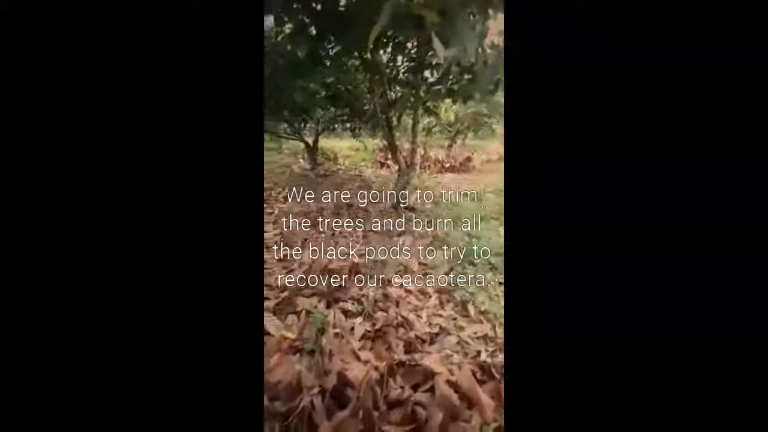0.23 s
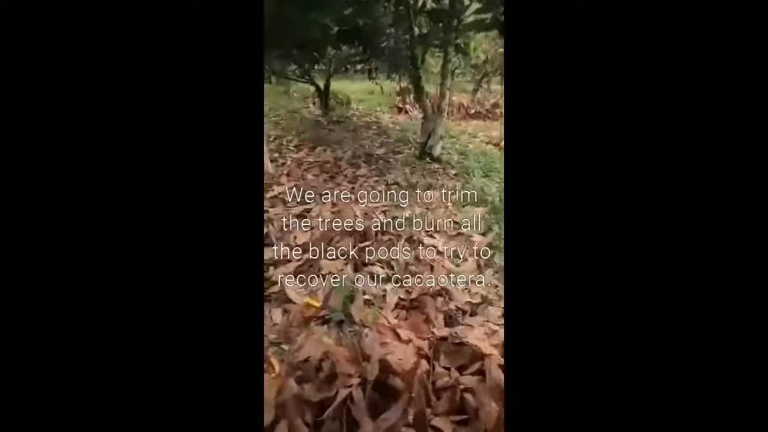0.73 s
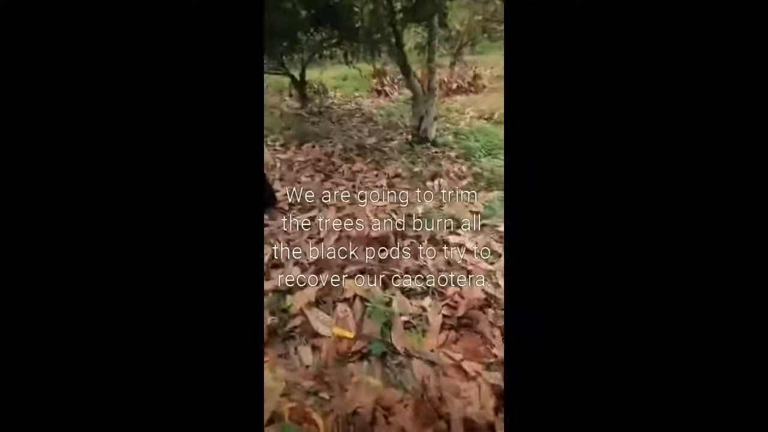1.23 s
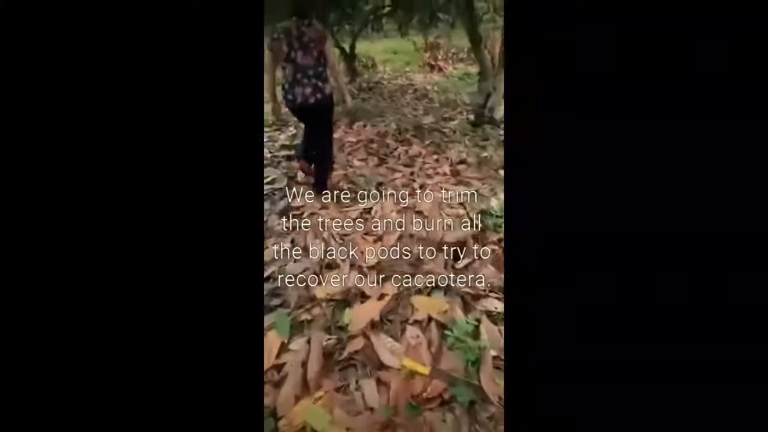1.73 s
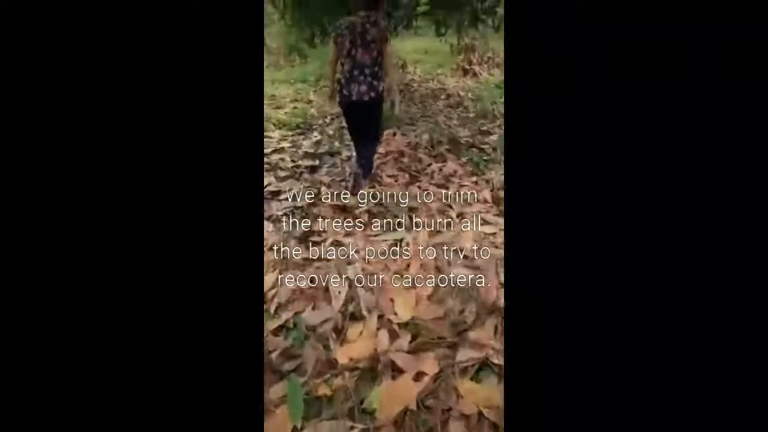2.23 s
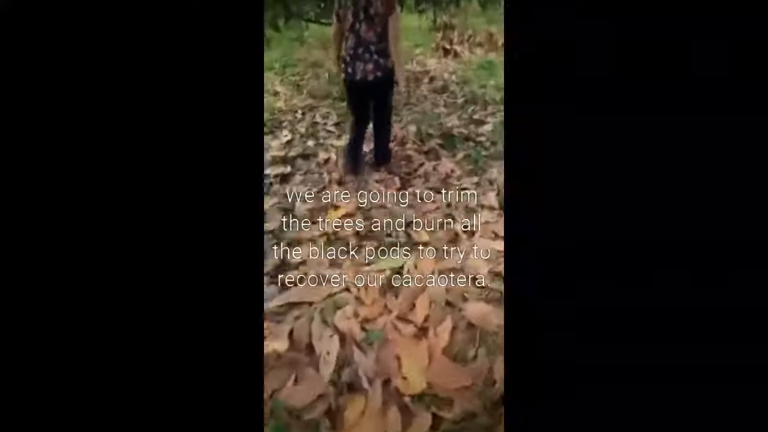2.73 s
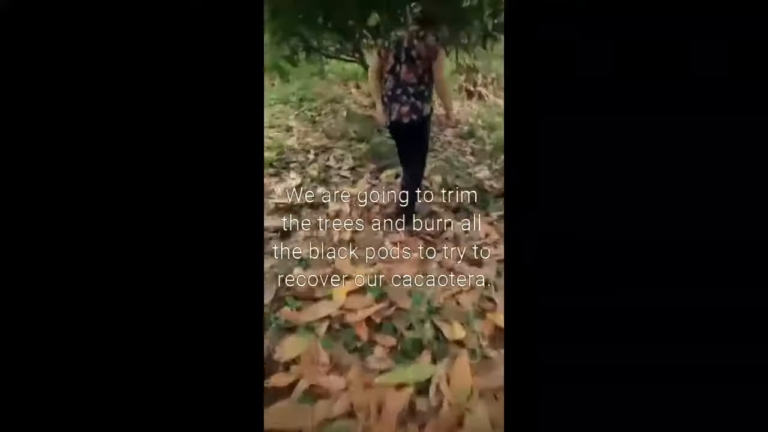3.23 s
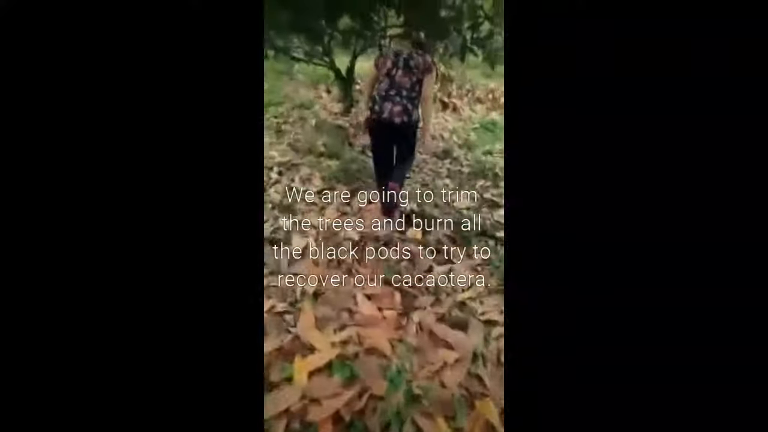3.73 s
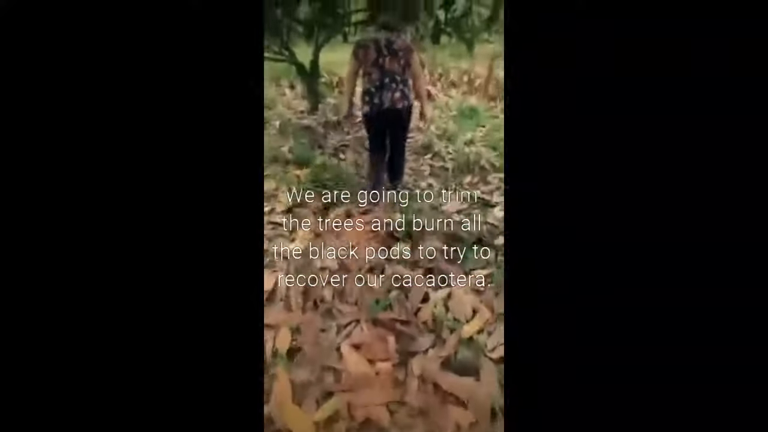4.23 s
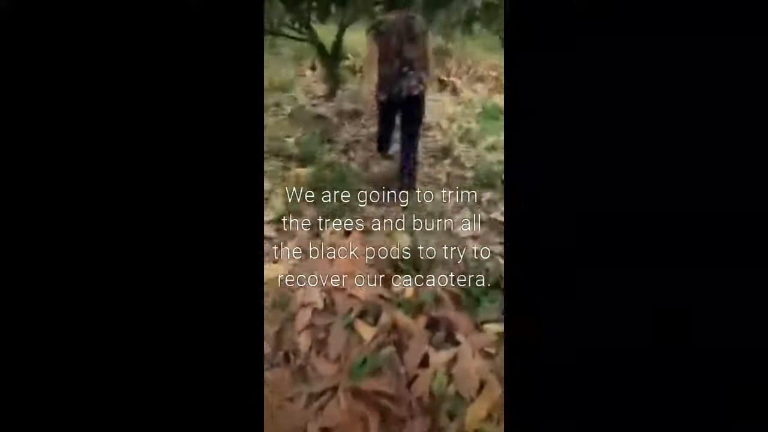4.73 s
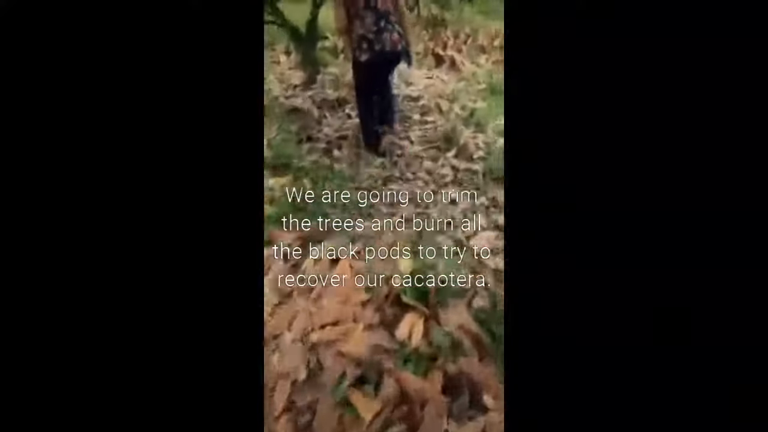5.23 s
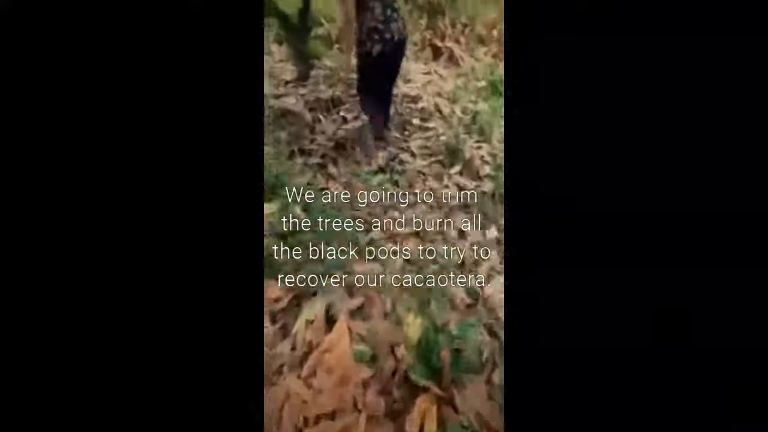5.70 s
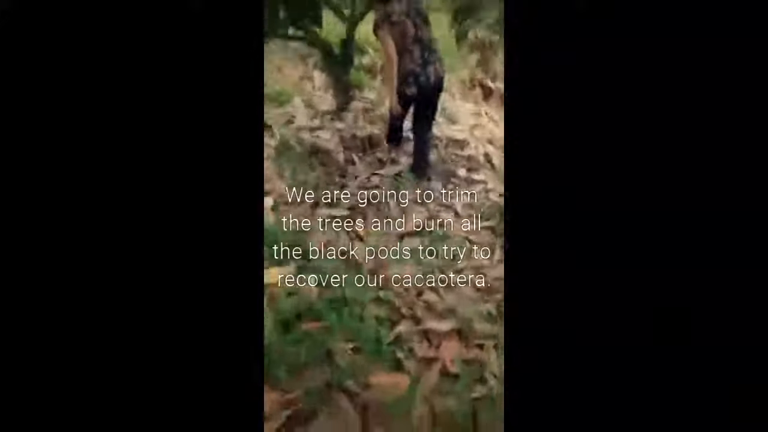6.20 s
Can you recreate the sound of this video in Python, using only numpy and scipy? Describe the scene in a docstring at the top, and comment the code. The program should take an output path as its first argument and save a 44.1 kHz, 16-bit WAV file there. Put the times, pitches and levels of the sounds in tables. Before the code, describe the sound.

Feet wade through a thick layer of dry leaves outdoors. A very brief low tone opens, then lighter rustles and modest crunches with scattered twig snaps. From about three seconds the steps become clearly louder and crisper, with sharp cracks and hollow knocks in the litter. Quiet air and soft bumps touch the close stereo microphone; the trees return only a faint echo.

```python
"""Two people walk through deep dry leaves under trees. A brief low tone comes first, over a faint hush and air.
Then feet rustle, stalks and twigs snap, and footfalls break showers of leaves and press and scuff the litter. A
little later, soft bumps sound at the microphone and hollow pockets in the litter knock as they cave in. Leaves,
snaps and knocks are noise bursts and short rings; the low tone and the bumps are short low swells, tones
roughened by noise; hush and air are coloured noise."""
import sys
import numpy as np
from scipy import signal
from scipy.fft import rfft, irfft
from scipy.io import wavfile
from scipy.ndimage import uniform_filter1d

SR = 44100
rng = np.random.default_rng(int(sys.argv[2]) if len(sys.argv) > 2 else 0)


def store_wav(level_fs):
    """Save 16-bit WAV to argv[1]."""
    pcm = np.round(np.clip(np.atleast_2d(level_fs), -1, 1) * 32767)
    wavfile.write(sys.argv[1], SR, pcm.T.astype(np.int16))


N = 284974


def from_db(db):
    """Turn decibels into gain."""
    return 10 ** (np.asarray(db) / 20)


def rms_one(x):
    """Scale to an average power of 1."""
    return x / np.sqrt(np.mean(x ** 2) + 1e-20)


def at_hz(points, hz):
    """Read a curve of (Hz, value) points along a log-frequency axis."""
    point_hz, value = np.transpose(points)
    return np.interp(np.log(hz + 1e-3), np.log(point_hz), value)


def colour(x, db_at):
    """Filter without pre-echo (minimum phase), with a gain in dB of db_at(Hz)."""
    size = 4096
    log_gain = np.log(from_db(db_at(np.fft.rfftfreq(size, 1 / SR))))
    # folding the cepstrum onto positive times makes the response start at once
    cepstrum = irfft(log_gain)
    cepstrum[1:size // 2] *= 2
    cepstrum[size // 2 + 1:] = 0
    response = irfft(np.exp(rfft(cepstrum)))
    return signal.oaconvolve(np.atleast_2d(x), response[None], axes=1)[:, :N]


def shaped(x, spectrum):
    """Filter a sound by a curve of (Hz, dB) points."""
    return colour(x, lambda hz: at_hz(spectrum, hz))


def band(x, low_hz, high_hz, order=4):
    """Keep the frequencies between two limits."""
    limits = [low_hz, min(high_hz, .45 * SR)]
    return signal.sosfilt(signal.butter(order, limits, "band", fs=SR, output="sos"), x)


def resonance(x, hz, width_hz):
    """Ring at one pitch, with a gain near 1 there; a narrower width rings longer."""
    r = np.exp(-np.pi * width_hz / SR)
    zeros = np.array([1, 0, -1]) * (1 - r * r) / 2
    poles = [1, -2 * r * np.cos(2 * np.pi * hz / SR), r * r]
    return signal.lfilter(zeros, poles, x + 1e-18)


def drift(rate):
    """Wander at random through `rate` new values a second, joined by lines, with RMS 1."""
    knots = rng.standard_normal(4000)
    return rms_one(np.interp(np.arange(N) / SR * rate, np.arange(len(knots)), knots))


def outdoors(hush_db=-61.5, air_db=-65.5, lumps_db=4.0):
    """A faint hush, and lumpy air that stirs steadily and comes in puffs, felt by each port on its own."""
    # Colour of the hush. Each row: frequency in Hz, relative level in dB per Hz.
    hush_colour = [(18, -31), (30, 1), (43, -6), (113, -2.5), (167, -3), (190, 1), (859, -20), (1240, -7),
                   (2310, -15.5), (5440, -20.5), (7240, -20), (8250, -38), (15000, -60)]
    # Colour of the stirring air. Each row: frequency in Hz, relative level in dB per Hz.
    air_colour = [(20, -24), (45, -15), (78, 0), (140, -3), (250, -15), (600, -40)]
    # Puffs of air at the microphone.
    # Each row: middle in seconds, level in dB, half-width in seconds (where power is down to 1/e).
    puffs = [(0.881, -60.5, 0.091), (1.47, -53.0, 0.19), (3.25, -64, 0.17), (4.2, -57, 0.21),
             (4.82, -58.0, .08), (5.6, -53.5, 0.069), (6.18, -56.5, .16)]
    t = np.arange(N) / SR
    power = from_db(air_db) ** 2
    for middle, db, width in puffs:
        power = power + from_db(db) ** 2 * np.exp(-((t - middle) / width) ** 2)
    lumps = from_db(lumps_db * np.array([drift(25), drift(25)]))
    air = rms_one(shaped(rng.standard_normal((2, N)), air_colour) * lumps)
    hush = rms_one(shaped(rng.standard_normal((2, N)), hush_colour))
    return np.sqrt(power) * air + from_db(hush_db) * hush


def bumps(trim_db=-3.5, swell_s=0.0032, rough=0.31):
    """Short low swells, often stronger on one side: a tone roughened by noise. Apart from the opening tone,
    they are bumps of low pressure at the ports."""
    # Short low swells; the first is a brief low tone at 320 Hz that opens the scene, the others are soft bumps
    # at the microphone. # Each row: start in seconds, peak in dB before the trim, pitch in Hz, left minus right
    # in dB.
    low_swells = [(0.0, -36, 320, 2), (0.772, -46.5, 123, 13.5), (0.945, -39.5, 118, -13),
                  (1.408, -45, 70.5, -10), (1.607, -34.5, 280, 0.5), (1.618, -34.5, 375, -8),
                  (1.629, -32.5, 160, -19), (1.649, -37.5, 260, -5), (2.045, -44.5, 107, -23),
                  (4.794, -41.5, 83.4, -20), (5.576, -26, 113, -31), (6.1, -45, 430, -4)]
    out = np.zeros((2, 2 * N))
    t = np.arange(SR // 10) / SR
    swell = (t / swell_s) ** 2 * np.exp(-t / swell_s)
    for s, peak_db, hz, pan_db in low_swells:
        rumble = rms_one(band(rng.standard_normal(len(t)), 0.45 * hz, 2.2 * hz, order=2))
        bump = swell * (np.sin(2 * np.pi * hz * t) + rough * rumble)
        bump /= np.abs(bump).max()
        sides = from_db([[pan_db / 2], [-pan_db / 2]])
        start = int(s * SR)
        out[:, start:start + len(t)] += from_db(peak_db + trim_db) * sides / sides.mean() * bump
    return out[:, :N]


def contact(start, level_db, rise_s, hold_s, fall_s, settle_db=-23, settle_fall_s=0.3):
    """Power of one contact: it grows with the load, holds and dies away while the bent leaves settle slowly."""
    t = np.arange(N) / SR - start
    load = np.clip(t / max(rise_s, 1e-3), 0, 1)
    after = np.maximum(t - rise_s - hold_s, 0)
    # both fall times are for a drop of 20 dB
    release = from_db(-20 * after / fall_s) ** 2
    settling = from_db(settle_db - 20 * after / settle_fall_s) ** 2
    return (from_db(level_db) * load) ** 2 * (release + settling)


def footwork(rest_db=-69.0, rustle_fall_s=0.17):
    """Add up the power of all contacts into dB levels of crunch, press, scuff and crisp upper crunch."""
    # Lighter rustles, as a foot lifts, swings or first brushes the leaves.
    # Each row: start in seconds, crunch in dB, swell in seconds, hold in seconds,
    # low body in dB relative to the crunch, crispness in dB.
    rustle_rows = [(0.018, -40.5, 0.1, 0.056, -13.5, 0.0), (0.283, -52, 0.038, 0.039, -8, 1),
                   (0.696, -53, 0.017, 0.14, -7.5, -2), (0.963, -45, 0.2, 0.16, -12.5, -3),
                   (1.162, -45.5, 0.038, 0.0045, -30, -1.5), (1.372, -46.5, 0.022, 0.048, -16, -1),
                   (1.7, -46.5, 0.016, 0.017, -18, -3), (1.891, -52, 0.017, 0.018, -6.5, -1),
                   (2.077, -50.5, 0.031, 0.15, -9.5, 0.5), (2.28, -44.5, 0.06, 0.032, -14.5, 0.5),
                   (2.651, -43.0, 0.11, 0.037, -13, -0.5), (2.824, -49, 0.12, 0.164, -13, 2.0),
                   (3.289, -40.5, 0.038, 0.03, -10, 0.5), (3.427, -43, 0.11, 0.011, -8, 1),
                   (3.577, -40.5, 0.21, 0.044, -14, 2.5), (3.991, -36, 0.21, 0.14, -12.5, -0.5),
                   (4.37, -37.5, 0.11, 0.008, -14, 1), (4.73, -39.5, 0.17, 0.012, -12, 0.5),
                   (5.019, -41.5, 0.018, 0.035, -10.5, 0), (5.193, -38.5, 0.034, 0.036, -15, 5.5),
                   (5.411, -43, 0.024, 0.083, -12.5, 1.0), (5.73, -48, 0.065, 0.014, -12.5, 3),
                   (5.964, -37.5, 0.097, 0.014, -16, -1.0), (6.189, -39.5, 0.0097, 0.015, -13, 3),
                   (6.276, -42, 0.083, 0.019, -10.5, 2)]
    # Footfalls. Each row: start in seconds, crunch in dB, loading in seconds, hold in seconds,
    # time to fall 20 dB in seconds, pressing and scuffing in dB relative to the crunch, crispness in dB.
    footfalls = [(0.16, -39, 0.035, 0.03, 0.15, -14, -12.5, 1),
                 (0.793, -39.5, 0.12, 0.019, 0.26, -14.5, -11, 2),
                 (1.434, -41, 0.015, 0.16, 0.072, -18, -8.5, 1),
                 (1.61, -40, 0.14, 0.047, 0.23, -11.5, -10, 0),
                 (2.379, -39.5, 0.03, 0.2, 0.082, -10, -10.5, 1),
                 (3.122, -30.5, 0.048, 0.066, 0.13, -9.5, -15, 1),
                 (3.789, -29, 0.029, 0.096, 0.22, -12.5, -14.5, 1.5),
                 (4.508, -28.5, 0.06, 0.033, 0.24, -11.5, -14.5, 1),
                 (5.261, -34, 0.056, 0.03, 0.13, -14.0, -13, 4.5),
                 (5.538, -40, 0.12, 0.058, 0.082, -12.5, -5, 1.5),
                 (6.093, -32, 0.029, 0.037, 0.083, -17, -12.5, 4.5)]
    contacts = list(footfalls)
    for s, db, rise, hold, body_db, crisp_db in rustle_rows:
        contacts.append((s, db, rise, hold, rustle_fall_s, body_db, body_db, crisp_db))
    # the litter stirs a little between contacts
    power = from_db(rest_db) ** 2
    for *shape, press_db, scuff_db, crisp_db in contacts:
        parts = from_db([[0], [press_db], [scuff_db], [crisp_db]]) ** 2
        power = power + parts * contact(*shape)
    return 10 * np.log10(power)


def fractures(crunch_db, per_s=2400, size_db=2.0, clump_db=2.5, crack_s=0.0013, ring_cycles=6.8,
              ring_db=-6.5, even_s=0.14):
    """Tiny breaks, denser under a harder step, crack and set leaves ringing; the level is evened out."""
    rate = per_s * from_db(.5 * (crunch_db - crunch_db.mean()) + clump_db * drift(90))
    sizes = from_db(size_db * np.minimum(rng.exponential(1, N), 3.5))
    breaks = sizes * (rng.random(N) < rate / SR)
    energy = signal.lfilter([1], [1, -np.exp(-2 / (crack_s * SR))], breaks ** 2 + 1e-18)
    cracks = np.sqrt(energy) * rng.standard_normal((2, N))
    # leaves of many sizes, each with its own short ring; small leaves ring faster and more weakly
    pitches = np.geomspace(300, 7000, 28)
    leaf = rng.integers(0, len(pitches), N)
    kicks = breaks * rng.choice([-1, 1], (2, N))
    rings = np.zeros((2, N))
    for k, hz in enumerate(pitches):
        rings += resonance(kicks * (leaf == k), hz, hz / ring_cycles) / hz ** 0.35
    rubbing = from_db(-3) * rng.standard_normal((2, N))
    shower = rms_one(cracks) + from_db(ring_db) * rms_one(rings) + rubbing
    local_power = uniform_filter1d(np.mean(shower ** 2, axis=0), int(even_s * SR))
    return shower / np.sqrt(local_power + 1e-9)


def shifting(x, patchy_db=2.5, per_s=22.0):
    """Hollows and ridges in each bunch of leaves keep shifting the colour: 12 resonances drift in strength."""
    out = x
    for hz in np.geomspace(300, 7000, 12):
        out = out + (from_db(patchy_db * drift(per_s)) - 1) * resonance(x, hz, hz / 4)
    return out


def crumples(crunch_db, per_s=220, size_db=3.5, fold_s=0.0021):
    """Whole leaves buckle under the sole: fewer and longer than the tiny breaks, evened out in level."""
    rate = per_s * from_db(.3 * (crunch_db - crunch_db.mean()))
    sizes = from_db(size_db * np.minimum(rng.exponential(1, N), 3.0))
    folds = sizes * (rng.random(N) < rate / SR)
    energy = signal.lfilter([1], [1, -np.exp(-2 / (fold_s * SR))], folds ** 2 + 1e-18)
    energy /= uniform_filter1d(energy, SR // 16) + .01 * energy.mean()
    return np.sqrt(energy) * rng.standard_normal((2, N))


def spread(pair):
    """Mix two unlike sounds into left and right, alike in the bass and scattered in the treble."""
    # Likeness of the two sides. Each row: frequency in Hz, likeness from 0 to 1.
    likeness = [(150, 0.97), (450, 0.92), (1500, 0.42), (3000, 0.37), (5000, 0.18), (7500, 0)]

    def alike(hz):
        return np.clip(at_hz(likeness, hz), 0, .98)

    mid = colour(pair[0], lambda hz: 10 * np.log10(1 + alike(hz)))
    side = colour(pair[1], lambda hz: 10 * np.log10(1 - alike(hz)))
    return mid + side * [[1], [-1]]


def steps(crunch_db, press_db, scuff_db, crisp_db, dull_trim_db=-3.5, crisp_trim_db=-3.5,
          press_trim_db=0.7, scuff_trim_db=1.5, splinter_trim_db=-10.5):
    """One shower of breaks sounds through packed litter, sliding leaves, brittle blades and fine splinters."""
    # Colour of the crunch. Each row: frequency in Hz, relative level in dB per Hz.
    leaf_colour = [(130, -12), (190, -6.5), (280, -2), (420, -2.5), (600, 0.5), (850, 7), (1300, -3),
                   (1700, 0), (2500, -1.5), (3100, -2), (4000, -3), (5200, -5.5), (6400, -2.5), (7400, 0.5)]
    breaks = fractures(crunch_db)
    shower = shaped(spread(shifting(breaks)), leaf_colour)
    deep = shaped(spread(breaks + crumples(crunch_db)), leaf_colour)
    press = from_db(press_db + press_trim_db) * rms_one(band(deep, 118, 545))
    scuff = from_db(scuff_db + scuff_trim_db) * rms_one(band(deep, 599, 1050))
    # crisper leaves tip the crunch towards its upper half
    tilt_db = (crisp_db - crunch_db) / 2
    crunch = band(shower, 1169, 7853, order=10)
    lower = signal.sosfiltfilt(signal.butter(4, 3500, fs=SR, output="sos"), crunch)
    upper = crunch - lower
    blades = from_db(crunch_db - tilt_db + dull_trim_db) * rms_one(lower)
    blades += from_db(crunch_db + tilt_db + crisp_trim_db) * rms_one(upper)
    # above the main crunch the fine crackle lies lower and fades with pitch
    fine = shaped(band(shower, 7750, 18000, order=10), [(8000, 0), (11000, -2), (14500, -8)])
    splinters = from_db(crunch_db + tilt_db + splinter_trim_db) * rms_one(fine)
    return press + scuff + blades + splinters


def ports(x, right_lead_s=.000385):
    """Sound from the ground reaches the right port first; each port has its own colour."""
    # How differently the two ports hear the ground. Each row: frequency in Hz, left minus right in dB.
    port_colour = [(200, -.5), (600, .3), (950, -2), (1300, .3), (1700, -3.2), (3800, -3.6), (6300, -7),
                   (7200, -4.3), (8200, -.3), (10000, -1.8), (13000, 0)]
    left = colour(x[0], lambda hz: at_hz(port_colour, hz) / 2)[0]
    right = colour(x[1], lambda hz: -at_hz(port_colour, hz) / 2)[0]
    late_left = np.pad(left, (round(right_lead_s * SR), 0))[:len(right)]
    return np.vstack([late_left, right])


def ribs(crunch_db, per_s=16, above_db=8.0, scatter_db=2.5, length_s=.005):
    """Smaller leaf ribs snap at random moments and pitches, louder in a louder crunch; gives rows for snaps()."""
    rows = []
    for when, size, pitch in rng.random((int(per_s * N / SR), 3)):
        peak_db = crunch_db[int(when * N)] + above_db + scatter_db * (2 * size - 1)
        rows.append((when * N / SR, peak_db, 1500 * 4.5 ** pitch, length_s))
    return rows


def snaps(rows, trim_db=-2.5):
    """A stalk gives way with a sharp crack and a short tearing; it rings and knocks on the litter under it."""
    out = np.zeros((2, 2 * N))
    t = np.arange(SR // 20) / SR
    stalk, litter, edge = from_db([-8, -5, -13])
    for s, peak_db, hz, length in rows:
        noise = rng.standard_normal((3, len(t)))
        # fibres tear just after the crack, then the shaken leaves settle
        fall = from_db(-60 * t / length) + from_db(-24 - 60 * t / .04)
        # mostly the same noise on both sides
        burst = (noise[0] + .4 * noise[1:]) * fall
        burst[:, 0] += 3  # the sharp crack
        snap = resonance(burst, hz, hz / 4)
        snap += stalk * resonance(burst, 2100, 1100)
        snap += litter * resonance(burst, 520, 250)
        snap += edge * band(burst, 1300, 14000, order=2)
        snap = ports(shaped(snap, [(7400, 0), (8200, -5), (14500, -7)]))
        snap /= np.abs(snap.mean(axis=0)).max()
        start = int(s * SR)
        out[:, start:start + snap.shape[1]] += from_db(peak_db + trim_db) * snap
    return out[:, :N]


def knocks(trim_db=5.5, collapse_s=0.038, width=0.63):
    """A pocket collapses in a quick rough burst, 60 dB down after collapse_s, that sounds its hollow."""
    # Hollow knocks as curled leaves and pockets in the litter cave in under the sole.
    # Each row: start in seconds, peak in dB before the trim, pitch in Hz.
    hollows = [(0.861, -41, 386), (1.802, -33, 503), (2.4, -39, 507), (3.147, -40, 592), (3.227, -35, 538),
               (3.806, -41, 357), (3.905, -39, 450), (4.556, -32, 611), (5.364, -32, 437),
               (5.634, -27.5, 717), (5.677, -29, 960), (6.137, -32, 490)]
    out = np.zeros(2 * N)
    t = np.arange(SR // 16) / SR
    for s, peak_db, hz in hollows:
        burst = rng.standard_normal(len(t)) * from_db(-60 * t / collapse_s)
        knock = resonance(resonance(burst, hz, width * hz), hz, 2 * width * hz)
        start = int(s * SR)
        out[start:start + len(t)] += from_db(peak_db + trim_db) * knock / np.abs(knock).max()
    return out[:N]


def trees(x, t60=0.38, wet_db=-14.5):
    """Trunks and foliage return a faint, diffuse echo: noise that falls 60 dB in t60 seconds."""
    t = np.arange(SR // 2) / SR
    echo = band(rng.standard_normal((2, len(t))), 520, 14000, order=1)
    echo = echo * from_db(-60 * t / t60) * (t > .005)
    echo /= np.sqrt(np.sum(echo ** 2, axis=1, keepdims=True))
    return x + from_db(wet_db) * signal.fftconvolve(x, echo, axes=1)[:, :N]


def scene():
    """Steps, knocks and snaps among the trees, with the air, the opening low tone and the bumps at the
    microphone."""
    # Stalks and twigs that snap.
    # Each row: start in seconds, peak in dB before the trim in snaps(), pitch in Hz, length in seconds.
    stalk_rows = [(.0469, -37, 7400, .022), (.0988, -30, 1940, .009), (.2859, -33, 1640, .016),
                  (.7017, -41, 2150, .021), (.757, -35, 950, .02), (.8622, -28, 1890, .014),
                  (1.7854, -23, 2500, .005), (1.8035, -17, 2110, .011), (1.827, -21, 1980, .008),
                  (2.1062, -37, 2370, .011), (2.597, -27, 6160, .016), (3.1343, -29, 5430, .03),
                  (3.3831, -29, 7450, .008), (3.6032, -26, 1810, .015), (3.6741, -25, 2500, .014),
                  (3.742, -23, 5900, .03), (3.821, -11.5, 4600, .04), (4.3337, -22, 6720, .015),
                  (4.4689, -19, 1810, .006), (4.4802, -19, 6930, .012), (4.654, -18, 5210, .016),
                  (4.7962, -29, 2330, .011), (4.8523, -27, 2370, .026), (5.0354, -28, 3060, .018),
                  (5.1931, -29, 7020, .011), (5.3535, -21, 6630, .011), (5.4122, -17, 6930, .011),
                  (5.4493, -26, 5940, .015), (5.6799, -22, 1030, .012), (5.7106, -25, 1100, .016),
                  (5.9756, -28, 2800, .028), (6.1152, -19, 5120, .013), (6.1529, -15, 6630, .015)]
    crunch_db, press_db, scuff_db, crisp_db = footwork()
    leaves = ports(steps(crunch_db, press_db, scuff_db, crisp_db) + knocks())
    snapping = snaps(list(stalk_rows) + ribs(crunch_db))
    return trees(leaves + snapping) + bumps() + outdoors()


def record(dry, cutoff_hz=14750):
    """Cut the top of the treble steeply."""
    return signal.sosfilt(signal.ellip(10, .2, 80, cutoff_hz, fs=SR, output="sos"), dry)


dry = scene()
out = record(dry)
store_wav(out)
```